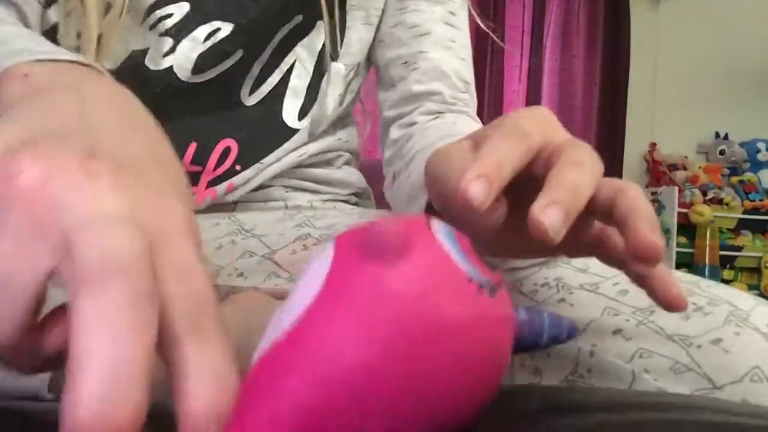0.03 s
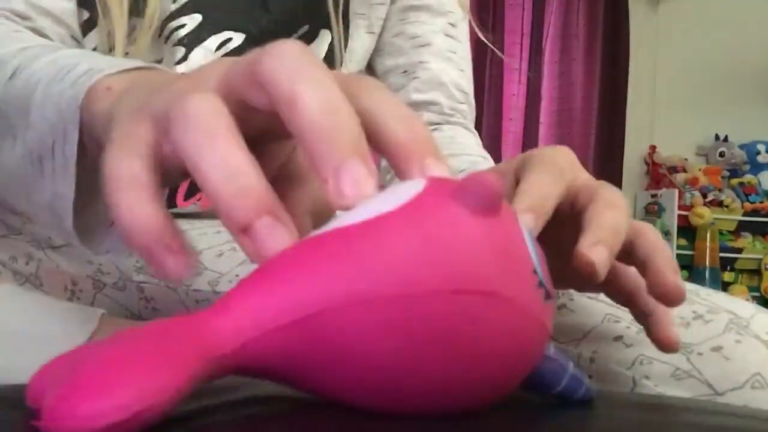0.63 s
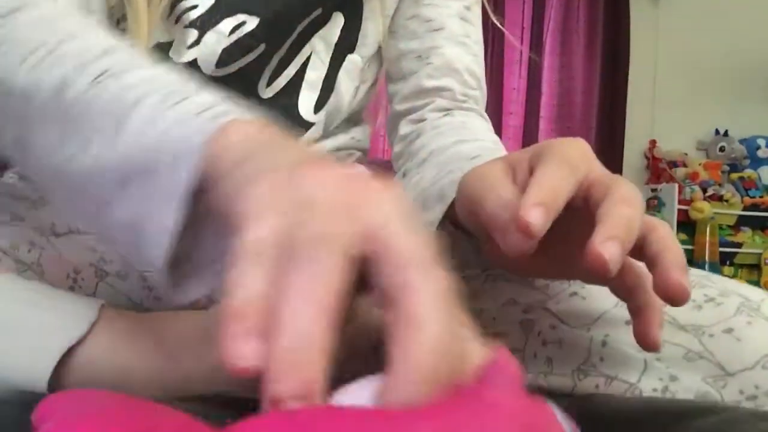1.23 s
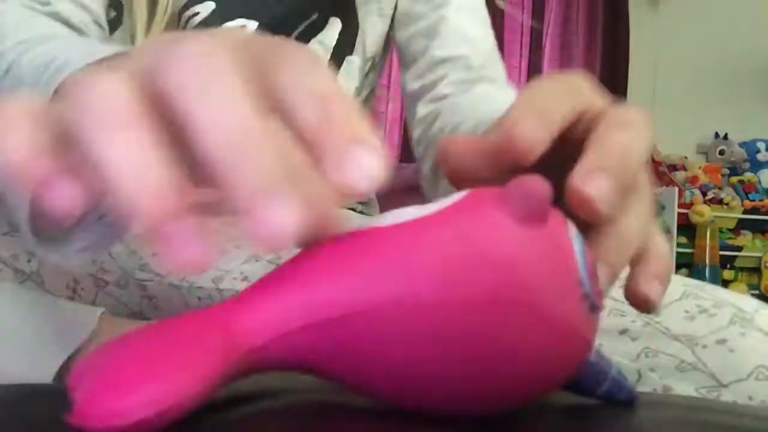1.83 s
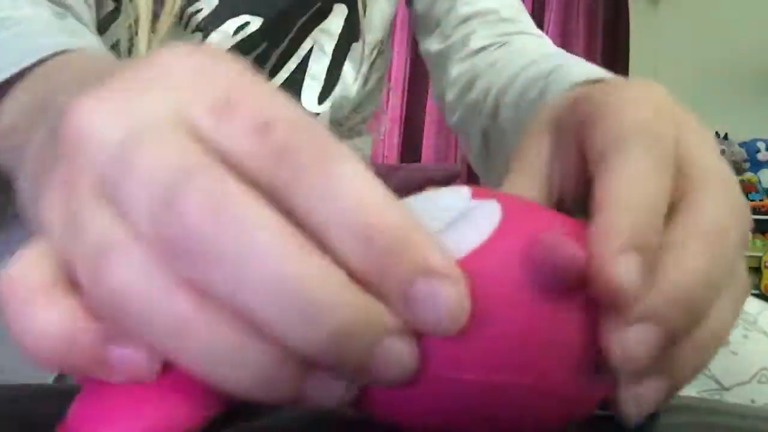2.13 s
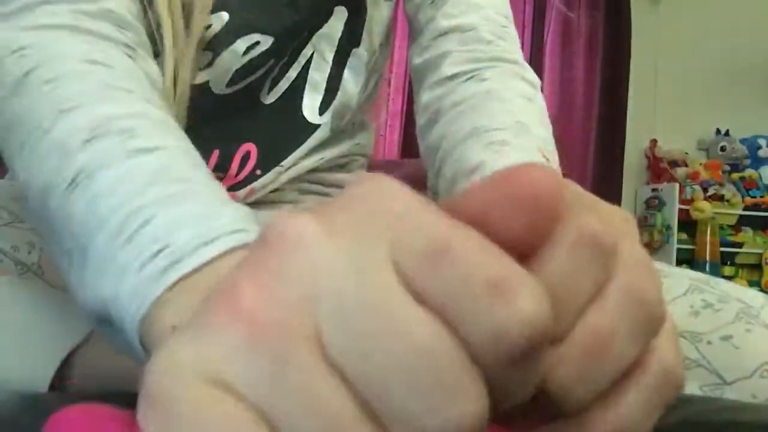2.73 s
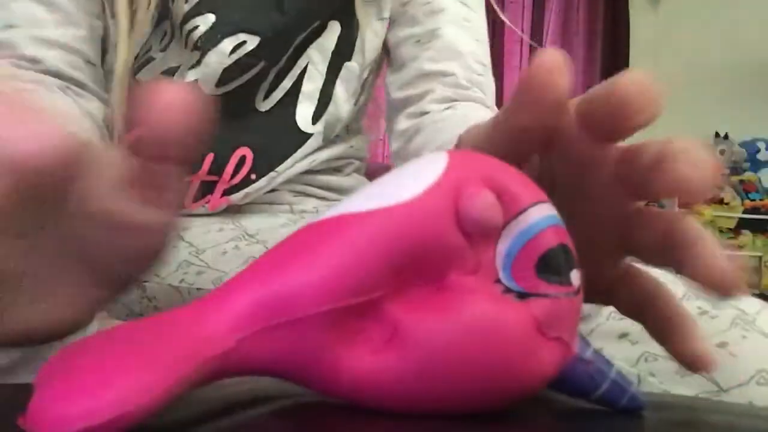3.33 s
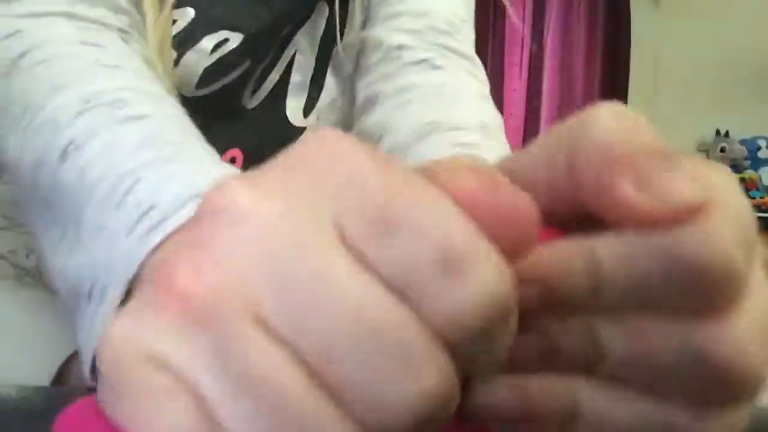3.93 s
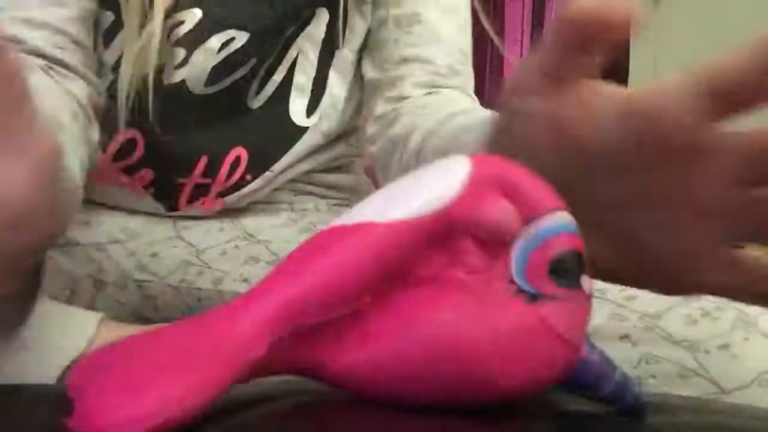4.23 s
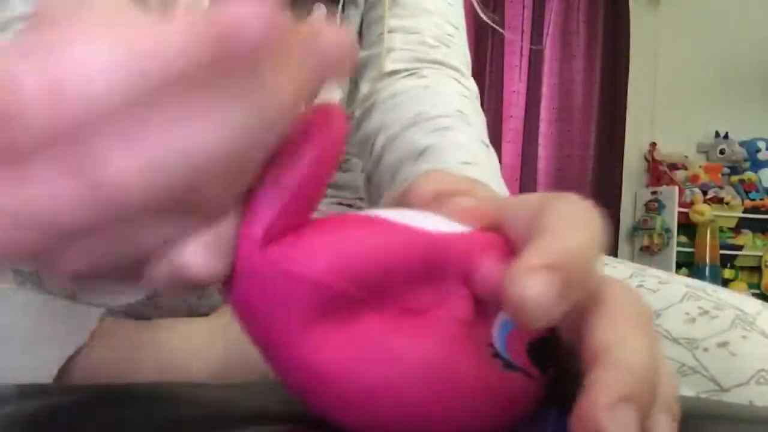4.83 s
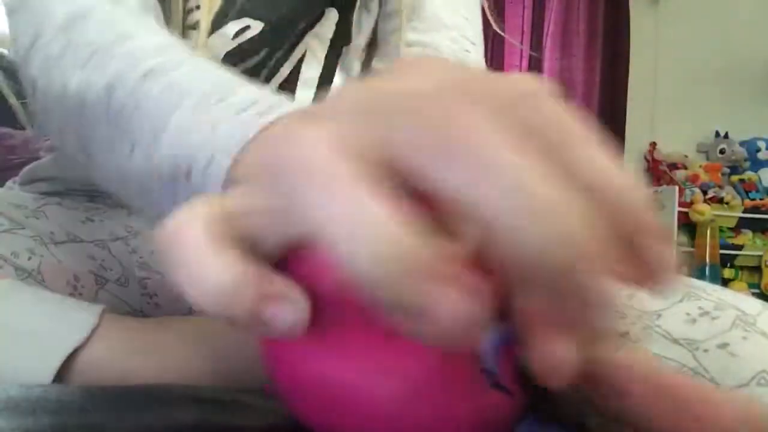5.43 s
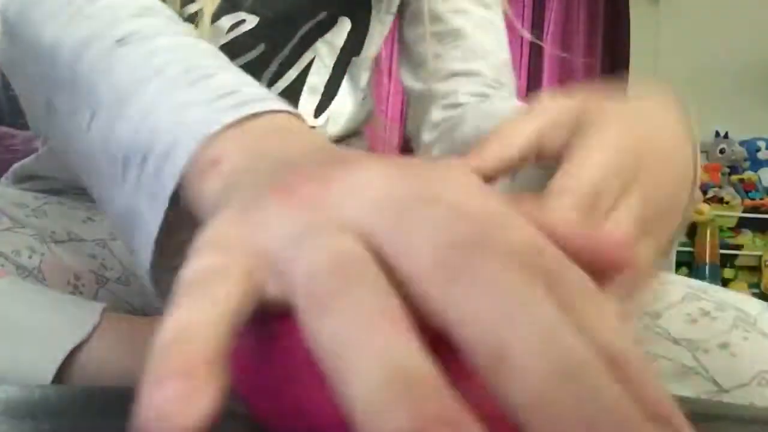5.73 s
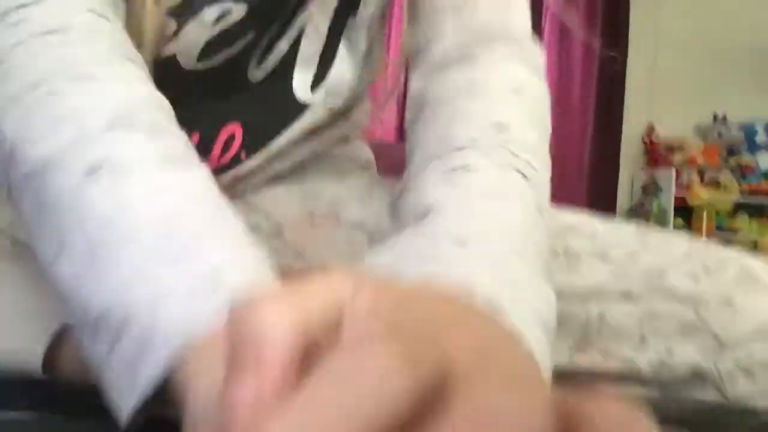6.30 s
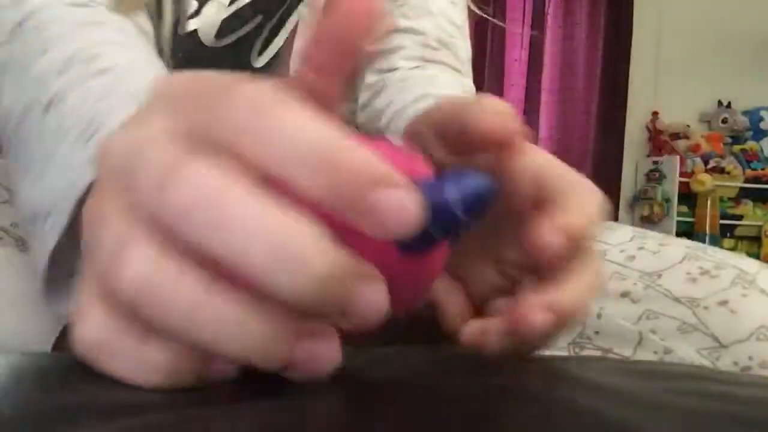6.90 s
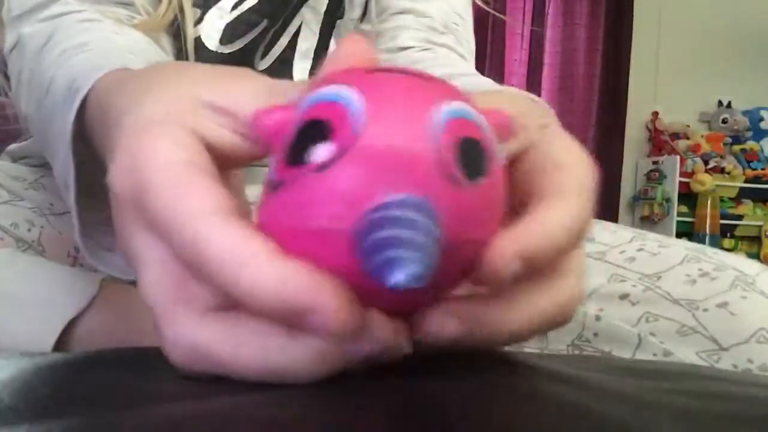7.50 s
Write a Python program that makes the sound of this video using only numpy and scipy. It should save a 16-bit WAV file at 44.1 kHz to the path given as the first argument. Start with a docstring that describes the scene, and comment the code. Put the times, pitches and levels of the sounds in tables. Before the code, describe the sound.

Hands pat and rub a soft foam toy on a padded table, right beside the microphone. Light fingertip taps and soft brushing come first. Then the toy is squeezed with a faint airy hiss and let go twice with short, sticky rasps. Dull knocks, small clicks and low bumps follow, and the rubbing grows busier near the end before easing off. A quiet room hums faintly behind.

```python
"""Hands pat, rub and squeeze a soft foam toy on a padded table, right beside a small microphone.
Skin brushes over the toy's coating and air seeps through the foam; on release the tacky skin peels
off in rasps. Taps travel through the table as bending waves, treble first, so each one
falls in pitch. A quiet room hums behind."""
import sys
import numpy as np
from scipy import signal
from scipy.fft import rfft, irfft, next_fast_len
from scipy.io import wavfile
from scipy.ndimage import uniform_filter1d, map_coordinates

SR = 44100
rng = np.random.default_rng(int(sys.argv[2]) if len(sys.argv) > 2 else 0)


def wav_out(sig):
    """Save sig, one row per channel (or a flat mono array), as 16-bit PCM at SR to the path in sys.argv[1]."""
    wavfile.write(sys.argv[1], SR, np.round(np.clip(np.atleast_2d(sig).T, -1, 1) * 32767).astype(np.int16))


N = 333396


def amp(db):
    """dB to gain."""
    return 10 ** (np.asarray(db) / 20)


def unit(x):
    """Scale to rms 1."""
    return x / np.sqrt(np.mean(x ** 2) + 1e-20)


def along(points, hz):
    """Interpolate (f/Hz, value) points on a log axis."""
    f, v = np.transpose(points)
    return np.interp(np.log(hz + 1), np.log(f + 1), v)


def wobble(rate_hz):
    """Smooth random curve, rate_hz knots per second."""
    knots = rng.standard_normal(int(N * rate_hz / SR) + 4)
    return map_coordinates(knots, [np.arange(N) * rate_hz / SR])


def filtered(x, response):
    """Apply a complex frequency response."""
    size = next_fast_len(len(x) + SR // 10)
    return irfft(rfft(x, size) * response(np.fft.rfftfreq(size, 1 / SR)), size)[:len(x)]


def noise(spectrum):
    """Coloured noise, rms 1."""
    return unit(filtered(rng.standard_normal(N), lambda hz: amp(along(spectrum, hz))))


def swell(t, rise_s, fall_s, shape=1.35, drop_db=8.5):
    """Gesture gain: crest at t = 0, drop_db lower one rise or fall away; shape 1 pointed, 2 round."""
    distance = np.abs(t) / np.where(t < 0, rise_s, fall_s)
    return amp(-drop_db * np.minimum(distance, 10) ** shape)


def room(hiss_db=-68, hum_db=-65, hum_hz=54.7, drift_hz=0.98, waver_db=2):
    """Steady hiss and a low, wavering hum."""
    # room noise: f/Hz, density/dB
    hiss_spectrum = [(20, 0), (60, 3.5), (110, -0.5), (330, -3), (450, -15.5), (620, -5), (1900, -13),
                     (4400, -16.5), (7000, -22), (10000, -26), (15500, -31)]
    phase = 2 * np.pi * np.cumsum(hum_hz + drift_hz * wobble(6.2)) / SR
    hiss = amp(hiss_db) * noise(hiss_spectrum)
    return hiss + amp(hum_db + waver_db * wobble(7.6)) * unit(np.sin(phase))


def walls(x, t60_s=0.45, wet_db=-21):
    """Add the short, faint reverb of a furnished room."""
    t = np.arange(SR // 3) / SR
    tail = rng.standard_normal(len(t)) * amp(-60 * t / t60_s) * (t > .005)
    return x + amp(wet_db) * signal.fftconvolve(x, tail / np.linalg.norm(tail))[:N]


def bending(hz, delay_cycles=0.98, knee_hz=4):
    """Bending waves in the table: each frequency arrives about one of its own periods late."""
    # table colour: f/Hz, gain/dB
    board = [(45, 3), (80, -0.5), (118, -3.5), (175, 2), (260, -2), (430, -4.5), (620, 0), (1000, -0.5)]
    return amp(along(board, hz)) * np.exp(-2j * np.pi * delay_cycles * np.log(hz + knee_hz))


def through_table(force, spectrum):
    """Colour a contact force and spread each jolt into a falling sweep."""
    return filtered(force, lambda hz: amp(along(spectrum, hz)) * bending(hz))


def coating(x, ring_db=-2):
    """Add the brief ring of the toy's coating."""
    # coating modes: f/Hz, width/Hz, gain/dB
    modes = [(940, 180, -16), (1310, 63, -18), (1765, 88, -10), (1960, 500, -3.5), (3030, 330, 1),
             (4370, 290, 0)]

    def ring(hz):
        return sum(amp(db) * 1j * hz * width / (centre ** 2 - hz ** 2 + 1j * hz * width)
                   for centre, width, db in modes)
    return filtered(x, lambda hz: 1 + amp(ring_db) * ring(hz))


def slips(size, rate_hz, spread_db, smooth):
    """Friction force: sparse, uneven jolts plus a share of smooth sliding noise."""
    heights = amp(spread_db * np.clip(rng.standard_normal(size), -2, 2)) * rng.choice([-1, 1], size)
    jolts = heights * (rng.random(size) < rate_hz / SR)
    return unit(unit(jolts) + smooth * rng.standard_normal(size))


def patchy(x, depth_db=2.5):
    """The colour shifts as different patches of skin touch."""
    spectra = signal.stft(x, nperseg=512)[2]
    field = uniform_filter1d(rng.standard_normal(spectra.shape), 6, axis=0)
    field = uniform_filter1d(field, 9, axis=1)
    return unit(signal.istft(spectra * amp(depth_db * unit(field)), nperseg=512)[1][:N])


def crackle(rub_db, offset_db=-8):
    """Single sticky spots tick while skin drags over the coating."""
    # ticks: f/Hz, density/dB
    tick_spectrum = [(800, -29), (1800, 8), (3000, 1), (4500, -6), (7000, -10), (14000, -21)]
    force = slips(N, rate_hz=60, spread_db=-2.5, smooth=0)
    return amp(rub_db + offset_db) * unit(through_table(force, tick_spectrum))


def ringing_ticks(decay_cycles=1.05, grit=0.034):
    """Skin snaps, fingertip ticks and the bright ring of knocks on the table, a few cycles each."""
    # short ringing ticks: t/s, level/dB, f/Hz
    events = [(1.07, -44.5, 2630), (1.114, -40.5, 4740), (1.467, -41, 3170), (1.4683, -24, 1080),
              (2.11, -39, 3900), (2.883, -32, 3000), (2.9005, -19, 2760), (2.9088, -39, 3500),
              (2.947, -27.5, 3500), (2.961, -32, 1700), (2.966, -25, 3400), (2.983, -33, 2200),
              (3.657, -48, 5000), (4.0976, -26, 2340), (4.476, -33, 1600), (4.65, -47, 4000),
              (4.989, -36, 3360), (5.42, -46, 2500), (5.4733, -22, 4200), (5.474, -23.5, 2030),
              (6.509, -37, 2200), (6.6155, -36, 5000), (6.661, -35, 4940), (6.692, -37, 3800),
              (6.768, -31.5, 4600), (6.896, -48, 1770), (7.247, -38.5, 740)]
    out, t = np.zeros(N + SR), np.arange(SR // 100) / SR
    for at_s, db, hz in events:
        ring = np.sin(2 * np.pi * hz * t) + grit * rng.standard_normal(len(t))
        out[round(at_s * SR):][:len(t)] += amp(db) * ring * np.exp(-hz * t / decay_cycles)
    return out[:N]


def peels():
    """Tacky skin lets go in a swelling run of slips that shake table and coating."""
    # peels: crest t/s, rise/s, fall/s, table/dB, rasp/dB, rasp centre/Hz, fizz/dB
    events = [(.322, 0.03, 0.017, -53.5, -64, 2500, -61), (2.882, .005, .01, -52, -54, 2400, -55),
              (2.912, .02, 0.013, -54, -55, 2400, -58), (2.926, 0.0086, 0.015, -36, -38, 1830, -47),
              (2.954, 0.02, 0.015, -38.5, -39.5, 1720, -51), (4.076, 0.0034, 0.017, -55, -47, 2200, -63),
              (4.098, 0.0022, 0.011, -50, -41.5, 2290, -49), (4.119, 0.0097, 0.02, -43, -36, 1730, -49),
              (4.455, 0.024, 0.021, -45.5, -53.5, 2000, -64), (4.48, .004, 0.018, -45.5, -59, 1700, -67),
              (5.055, 0.031, 0.019, -58, -56.5, 2440, -58), (5.299, 0.016, 0.0073, -63, -42, 2230, -59.5),
              (5.37, 0.04, 0.037, -75, -54, 2540, -78), (5.423, .003, 0.0096, -47.5, -54, 2200, -61),
              (5.437, 0.011, 0.003, -54, -44, 2020, -51.5), (5.68, .07, 0.052, -50, -70, 1400, -59),
              (6.655, 0.014, .02, -55, -53, 2760, -63), (6.757, 0.014, 0.011, -64, -51, 3430, -57),
              (6.82, 0.047, 0.048, -59, -60, 3140, -79)]
    # table shake: f/Hz, density/dB
    shake_spectrum = [(30, -5), (70, 9.5), (150, 2.5), (350, 1), (600, -4.5), (900, -3.5), (1300, -11.5),
                      (2200, -62), (5000, -100)]
    # coating rasp: f/centre, density/dB
    rasp_shape = [(.25, -21), (.65, -5), (1, 0), (1.35, -3), (1.8, -14.5), (3, -30), (6, -45)]
    # treble fizz: f/Hz, density/dB
    fizz_spectrum = [(1500, -34), (3200, -15), (4200, 4.5), (6200, -3), (8500, -6), (11000, -8.5),
                     (15500, -26)]
    out, size = np.zeros(N + SR), SR // 2
    t = (np.arange(size) - size // 2) / SR
    for at_s, rise_s, fall_s, table_db, rasp_db, centre_hz, fizz_db in events:
        envelope = swell(t, rise_s, fall_s, shape=1.31)
        force = envelope * slips(size, rate_hz=1000, spread_db=7.5, smooth=0.41)
        fine_force = envelope * slips(size, rate_hz=1300, spread_db=6.0, smooth=0.98)
        layers = [(force, shake_spectrum, table_db),
                  (coating(force), np.multiply(rasp_shape, [centre_hz, 1]), rasp_db),
                  (fine_force, fizz_spectrum, fizz_db)]
        for drive, spectrum, db in layers:
            wave = through_table(drive, spectrum)
            wave *= np.linalg.norm(envelope) / np.linalg.norm(wave)
            out[round(at_s * SR):][:size] += amp(db) * wave
    return out[size // 2:][:N]


def taps(thump_hz=72.4, click_hz=1500, tick_hz=5300, spot_db=2.5, scatter=0.31, scatter_t60_s=0.039):
    """Each contact sends a falling sweep through the table, with faint scatter from its edges."""
    # fingertips, nails and toy on the table: t/s, thump/dB, knock/dB, knock f/Hz, click/dB
    contacts = [(0.2718, -47.5, -48.5, 200, -66), (0.3035, -51, -54, 380, -44), (0.478, -61, -47, 242, -55),
                (0.6216, -80, -55, 670, -55), (0.6345, -78, -45.5, 550, -52),
                (0.6528, -47, -58.5, 270, -56), (1.4671, -38, -40, 139, -42),
                (1.6266, -57.5, -50.5, 260, -60), (1.685, -60, -53.5, 220, -70),
                (1.764, -42, -57.5, 270, -52.5), (1.8358, -60, -61, 570, -56), (1.9158, -63, -52, 380, -61),
                (1.9554, -90, -48, 600, -49), (1.966, -43, -55, 220, -65), (2.0172, -66, -59, 380, -49),
                (2.1099, -34, -42.5, 180, -60), (2.162, -55, -49, 350, -57), (2.3304, -58, -44.5, 233, -74),
                (2.899, -43, -48, 260, -45), (3.0335, -48.5, -42.5, 230, -49),
                (3.6383, -35.5, -83, 240, -43), (3.6792, -40.5, -44, 440, -36),
                (3.823, -47, -54, 290, -45.5), (3.9281, -53.5, -56, 380, -46),
                (4.1163, -39.5, -38, 640, -24.5), (4.2305, -49, -47.5, 330, -50),
                (4.293, -51, -47.5, 210, -67), (4.3308, -48, -45, 300, -40.5),
                (4.3458, -41, -39.5, 264, -41.5), (4.4769, -44, -37, 432, -43),
                (4.9895, -55, -54, 520, -50), (5.0228, -40.5, -39, 250, -38.5),
                (5.438, -32.5, -73, 220, -68), (5.4728, -39.5, -27.5, 440, -30),
                (5.5094, -78, -49, 670, -48), (5.6263, -58, -38.5, 313, -55), (5.805, -43, -46, 320, -55),
                (5.9941, -35.5, -41, 222, -56), (6.027, -56, -38.5, 279, -41.5),
                (6.0515, -51, -40.5, 330, -44), (6.2381, -49, -35, 282, -49.5),
                (6.333, -70, -36.5, 526, -59), (6.548, -79, -34, 289, -50), (6.591, -67, -40, 410, -43),
                (6.6799, -52, -43.5, 206, -45), (6.8732, -64, -38, 496, -41), (6.9105, -58, -40, 470, -41),
                (6.943, -68, -39.5, 366, -53)]
    size = SR // 5
    hz, t = np.fft.rfftfreq(size, 1 / SR), np.arange(size) / SR
    out = np.zeros(N + 2 * size)
    for at_s, thump_db, knock_db, knock_hz, click_db in contacts:
        tick_db = click_db - 10  # a harder contact raises both
        valley = (np.sqrt(knock_hz * click_hz), (knock_db + click_db) / 2 - 4)
        spectrum = [(1, -140), (30, thump_db - 22), (thump_hz, thump_db), (knock_hz, knock_db), valley,
                    (click_hz, click_db), (tick_hz, tick_db), (14000, tick_db - 16)]
        # each spot has its own dips and peaks
        spot = np.c_[np.geomspace(200, 9000, 20), rng.standard_normal(20)]
        sweep = amp(along(spectrum, hz) + spot_db * along(spot, hz)) / (hz + 1) * SR * bending(hz)
        lag_s = rng.uniform(0.00014, 0.0006)  # nail and pad land apart
        sweep *= 1 + 0.12 * np.exp(-2j * np.pi * hz * lag_s)
        edges = rng.standard_normal(size) * amp(-60 * t / scatter_t60_s)
        sweep *= 1 + scatter * rfft(edges / np.linalg.norm(edges))
        out[round(at_s * SR):][:size] += np.roll(irfft(sweep, size), size // 2)
    return out[size // 2:][:N]


def gestures(rest_rub_db=-80.5, rest_air_db=-86, firm_rub_db=-59, firm_push_db=-54.5, push_slope=0.97):
    """Strokes and leans add in power; returns weight, rub and air curves in dB."""
    # hand sliding and squeezing: fastest t/s, rise/s, fall/s, rub/dB, air/dB
    strokes = [(.03, 0.13, 0.2, -65.5, -70.5), (.235, 0.042, .06, -56, -66), (.32, .08, 0.018, -58, -57.5),
               (.66, .04, 0.035, -75, -86), (1.1, 0.32, 0.22, -72.5, -70), (1.28, 0.11, .11, -63.5, -67),
               (1.48, 0.076, 0.076, -58.5, -65.5), (1.69, 0.11, 0.095, -72.5, -74),
               (1.96, 0.05, 0.21, -66, -70), (2.22, 0.3, 0.12, -69.5, -70.5), (2.53, .14, 0.12, -56, -57.5),
               (2.79, 0.24, .05, -66, -70), (2.88, 0.048, 0.053, -56.5, -62),
               (2.985, 0.071, .025, -58.5, -61), (3.55, 0.21, 0.08, -72, -75),
               (3.66, 0.039, 0.046, -56, -63), (3.89, 0.15, 0.14, -60.5, -65),
               (4.162, 0.081, 0.016, -53, -53.5), (4.48, 0.11, 0.13, -56, -60),
               (4.67, 0.08, 0.061, -63.5, -63.5), (4.825, 0.073, 0.086, -64.5, -67),
               (4.95, 0.086, 0.079, -68, -78), (5.07, 0.053, .04, -66, -67),
               (5.155, 0.035, 0.023, -68, -63.5), (5.269, 0.045, 0.16, -58.5, -66),
               (5.465, 0.045, 0.023, -64.5, -62.5), (5.67, 0.072, 0.096, -54.5, -64),
               (5.92, 0.16, 0.046, -70.5, -79), (6.04, 0.044, 0.1, -61.5, -66.5),
               (6.392, 0.12, 0.051, -52.5, -59.5), (6.585, 0.092, 0.12, -51, -58),
               (6.76, 0.028, 0.036, -54, -59.5), (6.89, 0.05, 0.088, -55.5, -68),
               (7.07, 0.095, 0.062, -62.5, -61.5), (7.26, 0.085, 0.097, -62.5, -65),
               (7.49, 0.09, 0.072, -71.5, -70.5)]
    # weight shifting without sliding: t/s, rise and fall/s, level/dB
    leans = [(.345, 0.047, -50), (.54, .03, -62), (.68, 0.043, -53.5), (.77, 0.15, -58.5),
             (1.79, 0.056, -49), (1.865, 0.042, -49.5), (2.08, 0.1, -53), (2.26, 0.034, -48.5),
             (2.44, 0.046, -46), (2.59, 0.035, -48), (3.01, 0.067, -55), (4.19, 0.068, -49),
             (4.35, .04, -43.5), (4.68, 0.078, -60), (5.11, 0.041, -49.5), (5.28, 0.033, -48),
             (5.5, 0.033, -50.5), (5.72, 0.07, -45.5), (6.03, 0.035, -42.5), (6.175, 0.021, -46),
             (6.78, .025, -50), (6.9, 0.053, -43.5), (7.04, 0.12, -52.5), (7.3, 0.041, -48.5)]
    t = np.arange(0, N / SR, .002)
    rub_power, air_power = amp(rest_rub_db) ** 2, amp(rest_air_db) ** 2  # hands are never quite still
    for at_s, rise_s, fall_s, rub_db, air_db in strokes:
        speed = swell(t - at_s, rise_s, fall_s)
        rub_power += (amp(rub_db) * speed) ** 2
        air_power += (amp(air_db) * speed) ** 2
    push_power = amp(firm_push_db + push_slope * (10 * np.log10(rub_power) - firm_rub_db)) ** 2
    lean_power = sum((amp(db) * swell(t - at_s, span_s, span_s)) ** 2 for at_s, span_s, db in leans)
    return [np.interp(np.arange(N) / SR, t, 10 * np.log10(power))
            for power in (push_power + lean_power, rub_power, air_power)]


def hands(weight_db, rub_db, air_db):
    """Weight rocks the table, skin rubs in fine grains and air hisses through the foam's pores."""
    # table under shifting weight: f/Hz, density/dB
    sway_spectrum = [(15, -34), (30, -6.5), (50, 8), (75, 10.5), (160, 2.5), (260, -6), (450, -31),
                     (1000, -42), (4000, -100)]
    # coarse drag: f/Hz, density/dB
    drag_spectrum = [(90, -3.5), (180, -4), (330, 5.5), (560, -2), (900, -7), (1500, -15.5), (4000, -49),
                     (12000, -90)]
    # skin on coating: f/Hz, density/dB
    rub_spectrum = [(150, -16), (400, 7), (700, 1.5), (1300, 3.5), (1900, -3), (3000, -6.5), (4200, -16.5),
                    (7000, -26), (14000, -38)]
    # air through foam: f/Hz, density/dB
    air_spectrum = [(1000, -23), (2500, 1), (3300, 1), (6200, -3.5), (8000, -10), (10000, -10.5),
                    (15500, -16.5)]
    grip = wobble(45)  # tightens and eases unevenly
    sway = unit(through_table(slips(N, rate_hz=71, spread_db=-1.5, smooth=0.71), sway_spectrum))
    drag = unit(through_table(slips(N, rate_hz=400, spread_db=2.5, smooth=0.48), drag_spectrum))
    friction = slips(N, rate_hz=970, spread_db=4.0, smooth=1.7)
    skin = through_table(coating(friction, ring_db=-2.5), rub_spectrum)
    drag_db = rub_db + 0.43 * (weight_db - rub_db)  # a heavier hand rubs more coarsely
    return (amp(weight_db - 1) * sway
            + amp(drag_db - 4 + 4.5 * grip) * drag
            + amp(rub_db - 1 + 1.9 * grip) * patchy(skin)
            + amp(air_db + 1.5 + 1.87 * grip) * patchy(noise(air_spectrum)))


def scene():
    """Hands, toy and table in the room; mono."""
    weight_db, rub_db, air_db = gestures()
    handling = taps() + peels() + ringing_ticks() + hands(weight_db, rub_db, air_db) + crackle(rub_db)
    return (walls(handling) + room())[None]


def record(dry, top_hz=15880):
    """The microphone's port cuts two dips in the treble; nothing passes above top_hz."""
    # microphone response: f/Hz, gain/dB
    response = [(15, -25), (40, -1), (4400, -1.5), (4900, -4), (5800, 0), (9500, -2.5), (10400, -6),
                (11400, -2), (15500, 0)]
    return np.array([filtered(x, lambda hz: amp(along(response, hz)) * (hz < top_hz)) for x in dry])


dry = scene()
out = record(dry)
wav_out(out)
```